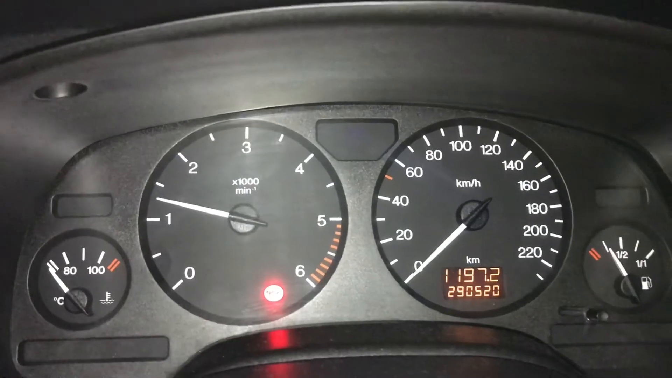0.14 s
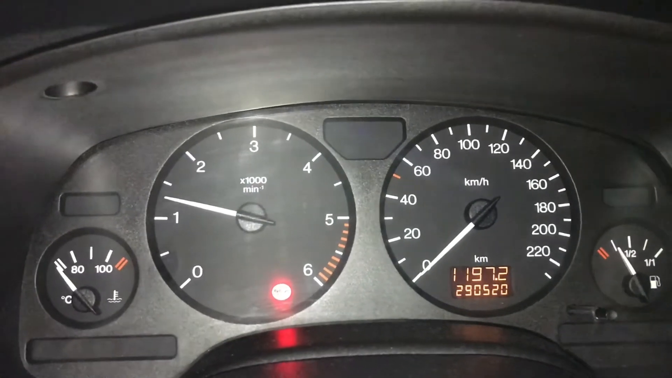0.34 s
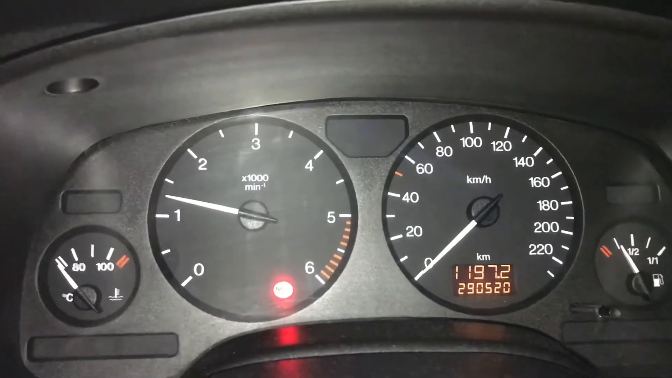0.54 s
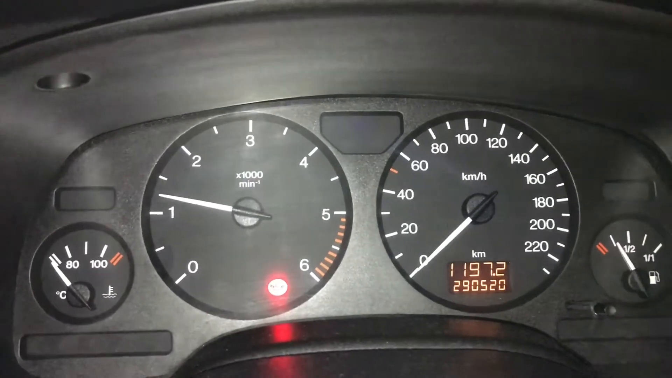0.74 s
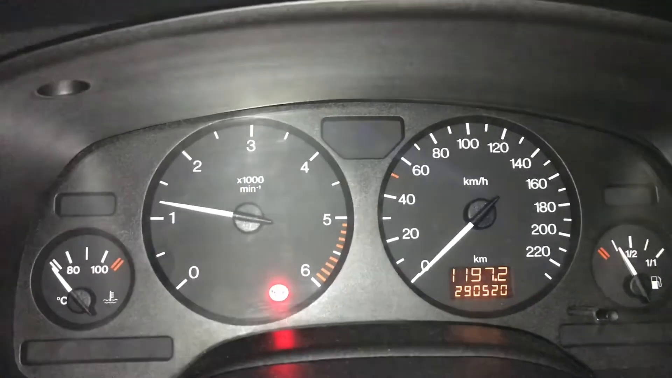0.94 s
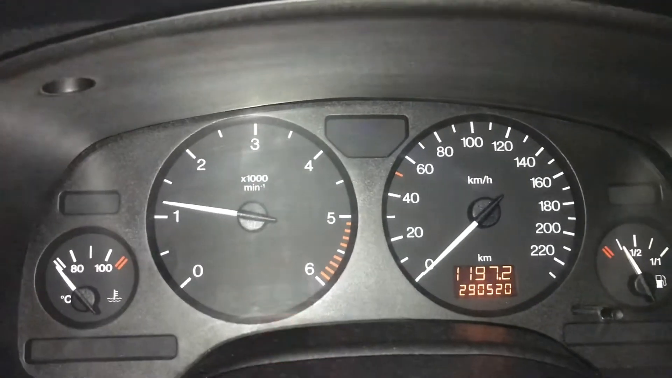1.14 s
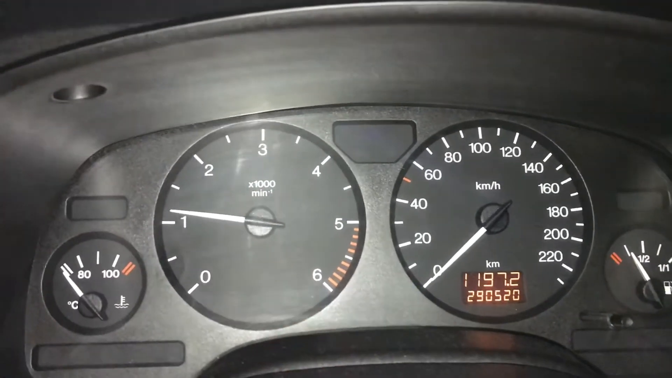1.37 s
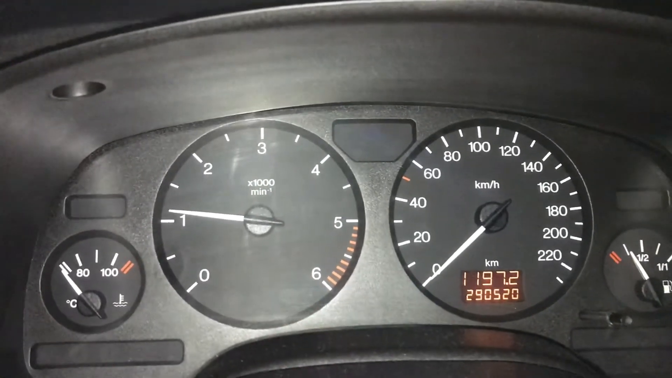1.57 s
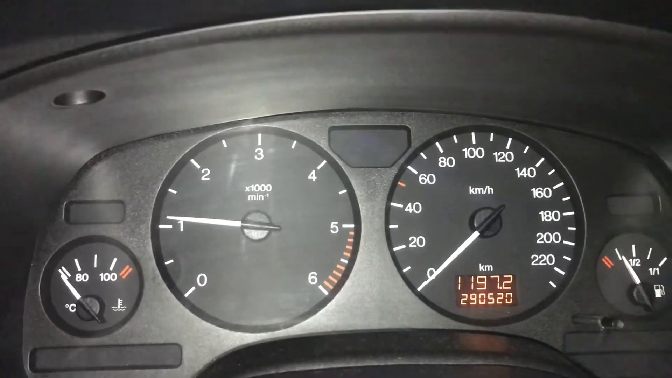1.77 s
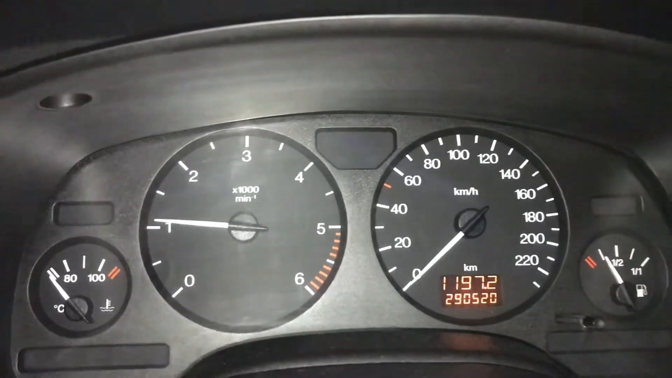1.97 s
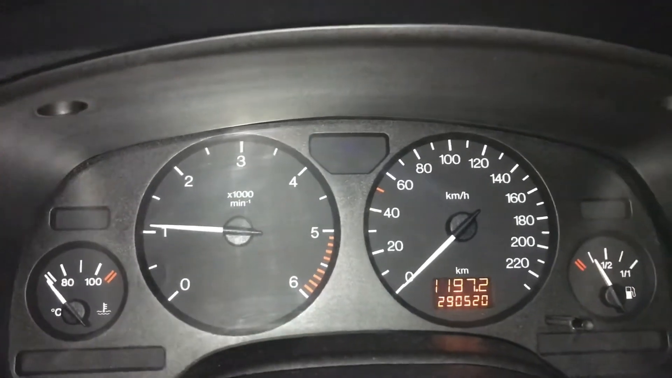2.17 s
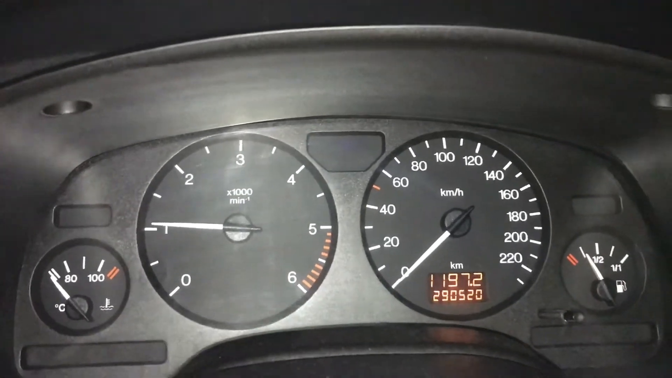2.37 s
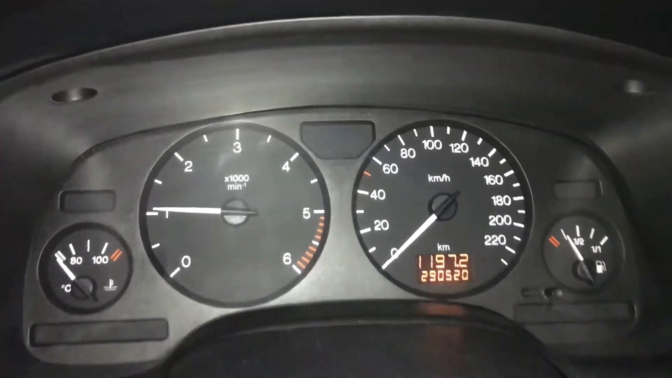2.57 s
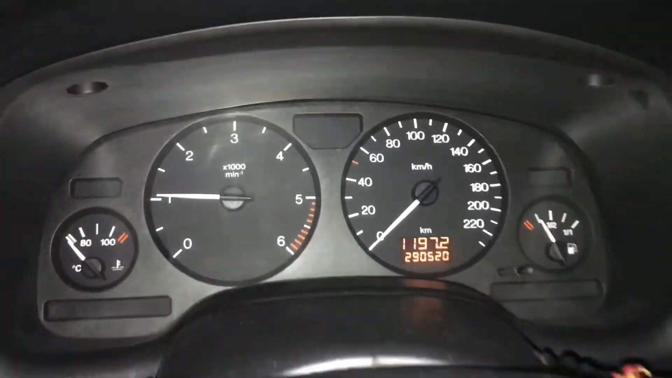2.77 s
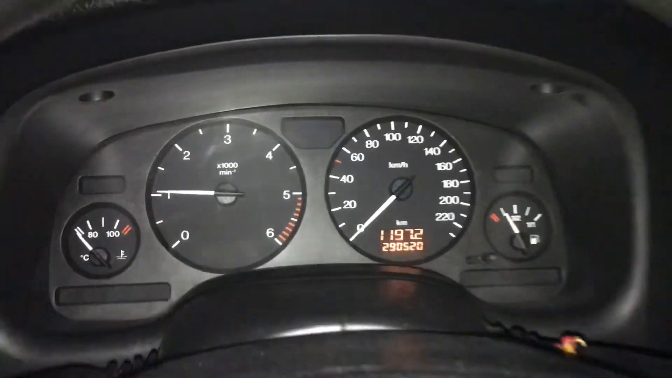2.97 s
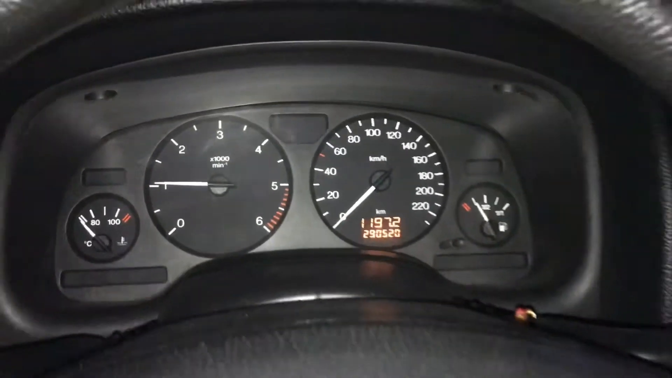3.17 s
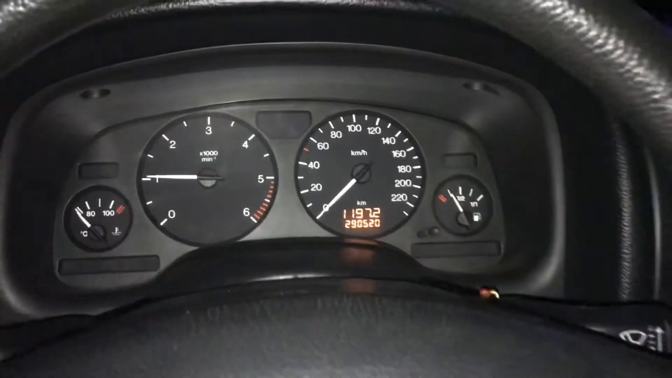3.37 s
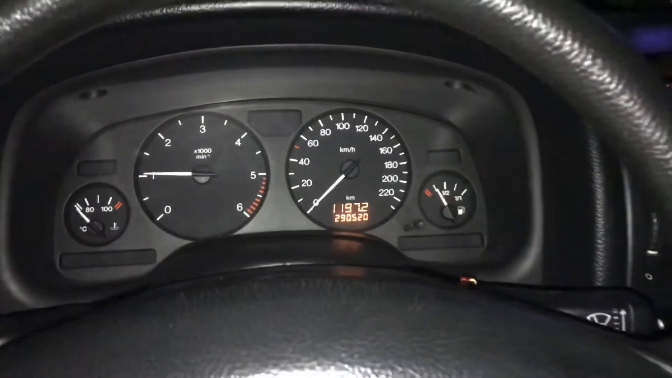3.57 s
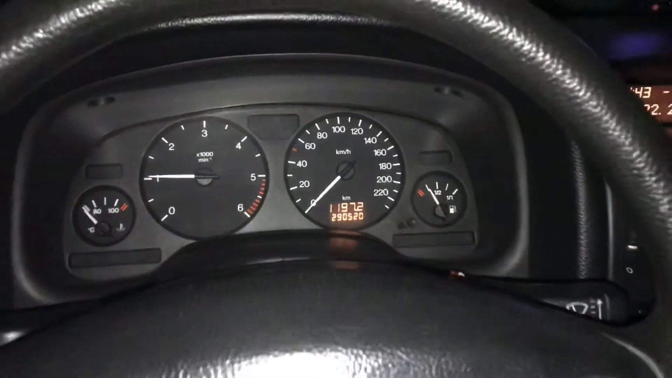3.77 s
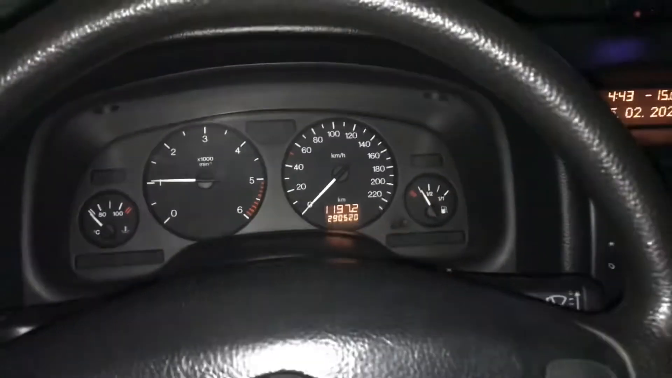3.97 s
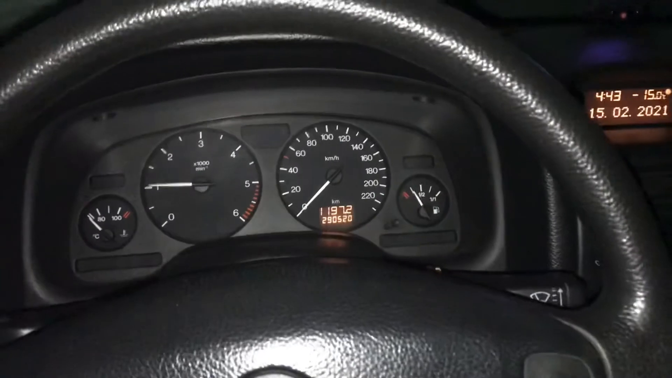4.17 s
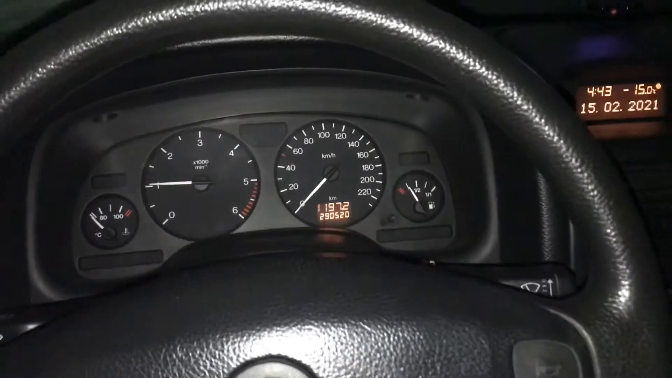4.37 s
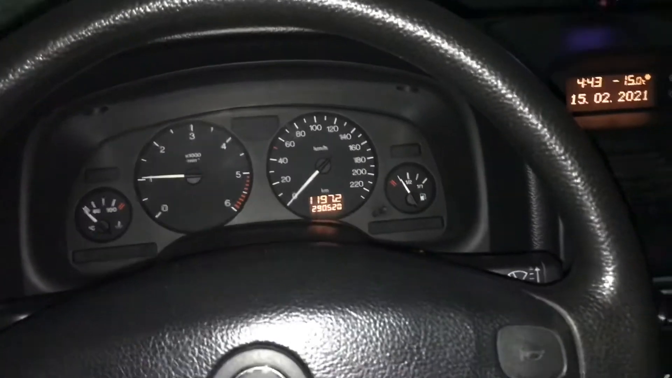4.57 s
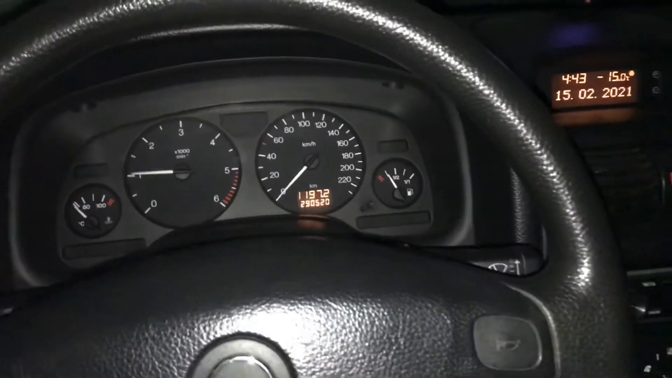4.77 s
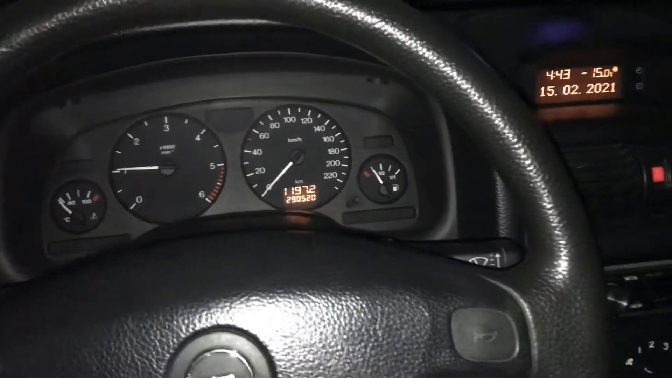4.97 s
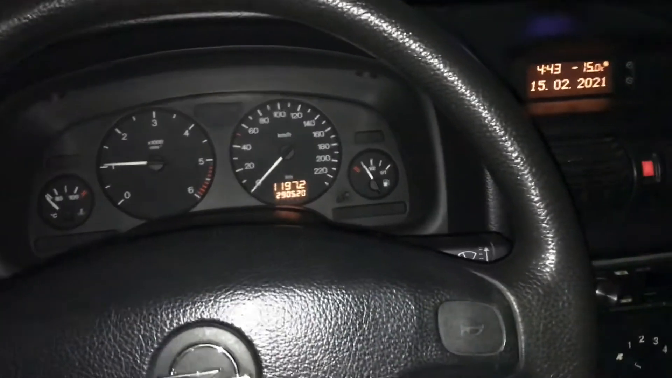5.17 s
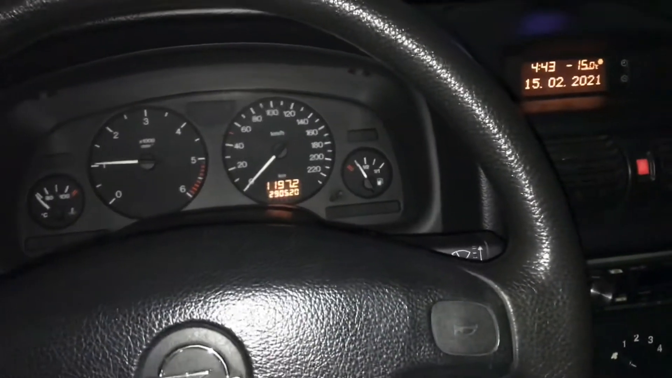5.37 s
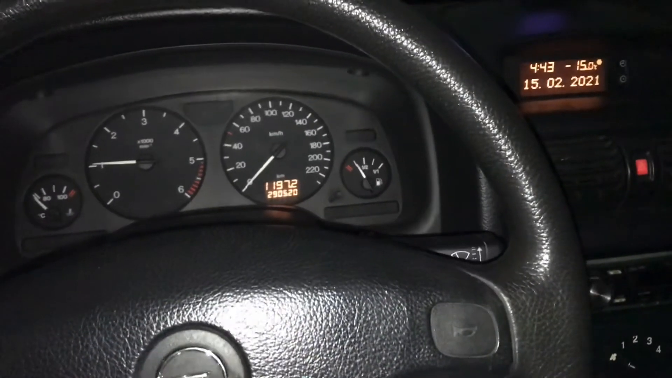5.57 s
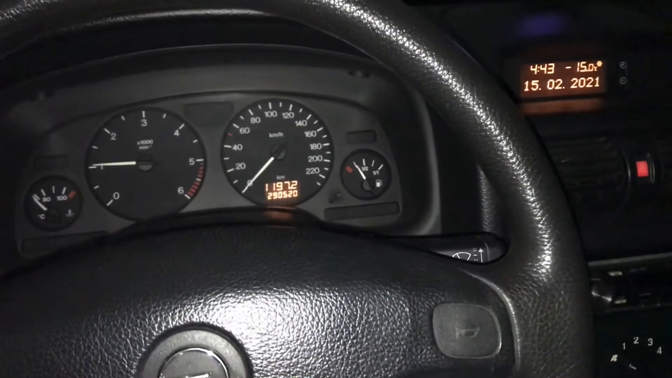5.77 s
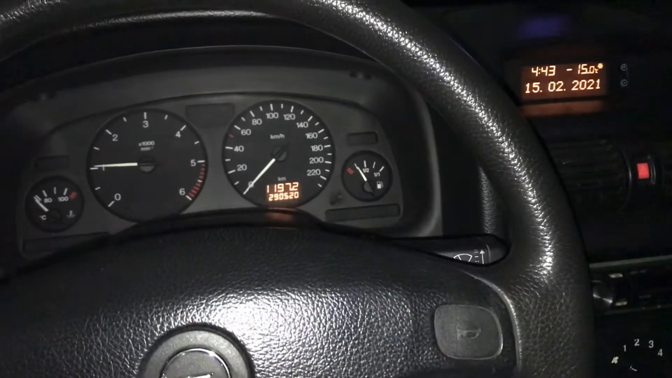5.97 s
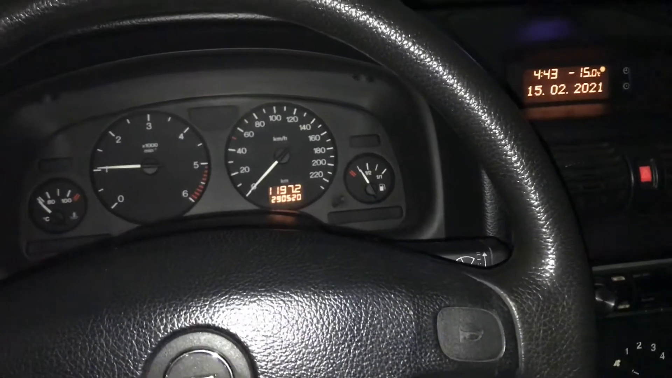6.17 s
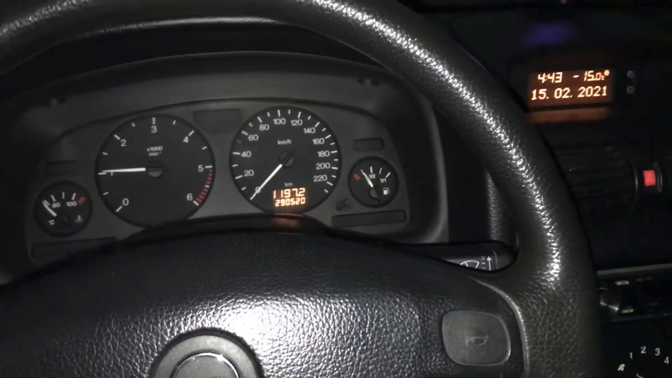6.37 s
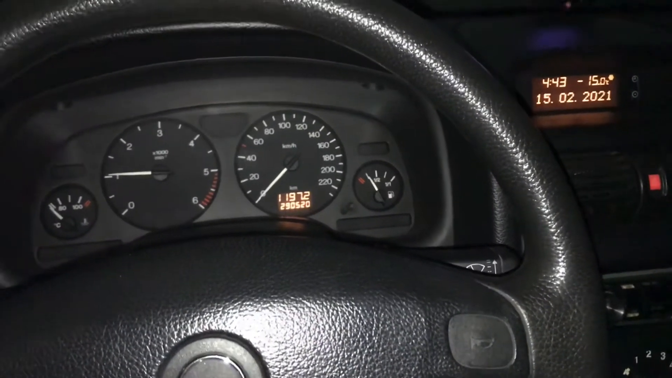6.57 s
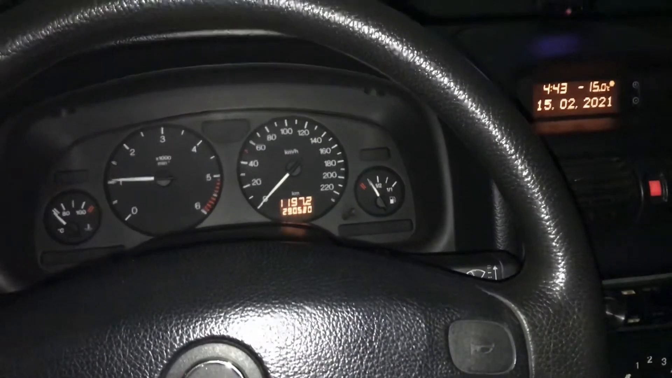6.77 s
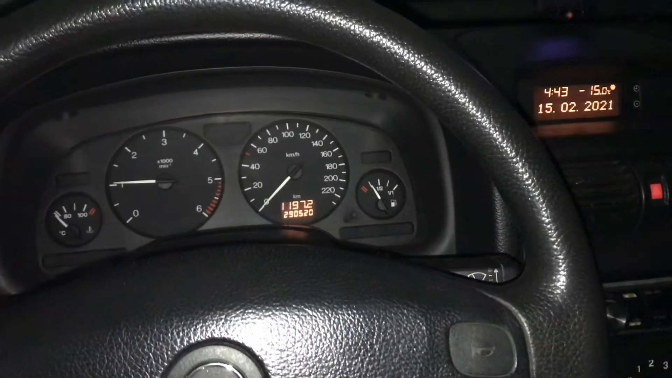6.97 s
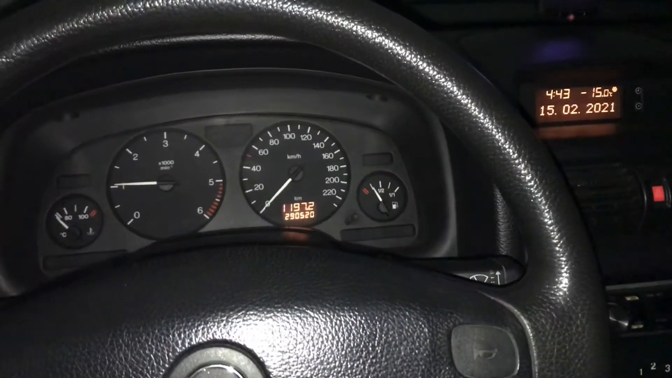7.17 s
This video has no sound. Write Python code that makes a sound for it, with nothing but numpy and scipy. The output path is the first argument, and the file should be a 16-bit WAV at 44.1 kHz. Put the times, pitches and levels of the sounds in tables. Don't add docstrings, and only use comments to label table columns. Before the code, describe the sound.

A phone close to the dashboard hears a cold four-cylinder diesel just after it catches, with no cranking. At 0 s a short, loud jolt leads into a fast idle, about 43 firings per second: a heavy low boom, rough bodywork clatter and hard knocks in a repeating four-beat pattern. Plastic trim ticks and soft low bumps from a finger come in the first half second, the deepest at 0.44. The engine slows steadily; the boom thins and stumbles at 1.2 and 1.7, with a light jolt near 1.3 and a faint high clip buzz. From 1.7 to 2 a loose panel ticks rapidly as speed dips to about 34.5. It then holds near 35 until 7.2. Between 2.7 and 4.4 the phone backs away with faint hand rustle; panel hum fades, while clacks, valve clicks and injector pings become clearer over low rumble and light hiss.

```python
import sys
import numpy as np
from scipy import signal
from scipy.fft import rfft, irfft, next_fast_len
from scipy.io import wavfile
from scipy.ndimage import uniform_filter1d

SR = 44100
rng = np.random.default_rng(int(sys.argv[2]) if len(sys.argv) > 2 else 0)


def ratio(d):
    e = np.asarray(d, float) / 20
    return 10 ** e


def to_wav(sig):
    pcm = np.clip(np.atleast_2d(sig), -1, 1) * 32767
    pcm = np.round(pcm).astype(np.int16)
    wavfile.write(sys.argv[1], SR, pcm.T)


N = 318843
COARSE = 10

CYLINDER_DB = [-1.5, .8, .3, -1.5]
# [t/s, level/dB, half length/s]
JOLTS = [
    (0.0, 12, .015),
    (1.29, 3, .015),
    (2.7, 4, .04),
    (3.85, 4, .025),
]


def curve(table, column):
    rows = np.array(table)
    return np.interp(np.arange(N) / SR, rows[:, 0], rows[:, column])


def unit(x):
    return x / np.sqrt(np.mean(x ** 2))


def colour(x, points):
    size = next_fast_len(N)
    hz = np.maximum(np.arange(size // 2 + 1) * SR / size, 1)
    f, db = np.transpose(points)
    gain = ratio(np.interp(np.log(hz), np.log(f), db, left=-90, right=-90))
    return irfft(rfft(x, size) * gain, size)[:N]


def ring(x, modes):
    return sum(ratio(db) * signal.lfilter(*signal.iirpeak(hz, hz / width, SR), x) for hz, width, db in modes)


def walk(rate_hz, hop=50):
    k = int(SR / rate_hz / hop)
    held = np.repeat(rng.standard_normal(N // hop // k + 2), k)
    slow = 1.3 * uniform_filter1d(uniform_filter1d(held, k), k)
    return np.interp(np.arange(N) / hop, np.arange(len(slow)), slow)


def swell(events):
    return sum(db * np.exp(-((np.arange(N) / SR - s) / half) ** 2) for s, db, half in events)


def span(start_s, end_s, edge_s=.02):
    t = np.arange(N) / SR
    return np.clip(np.minimum(t - start_s, end_s - t) / edge_s, 0, 1)


def heard_db(away, near_db, away_db, drift_db_per_s):
    return near_db + away * (away_db - near_db) + drift_db_per_s * np.arange(N) / SR


def cold_db():
    return 1.5 * span(-1, 2.03)


def firings(turn, at, pattern_db, scatter_db):
    count = np.floor(turn - at).astype(int)
    where = np.flatnonzero(np.diff(count) > 0) + 1
    cylinder = count[where] % 4
    scatter = scatter_db * rng.standard_normal(len(where))
    out = np.zeros((4, N))
    out[cylinder, where] = ratio(np.array(pattern_db)[cylinder] + scatter)
    return out


def burst_shape(hits, fade_s):
    return unit(signal.lfilter([1], [1, -np.exp(-1 / (fade_s * SR))], hits.sum(axis=0)))


def repeat(hits, own, rise_s, fade_s):
    age = np.arange(6000) / SR
    envelope = np.exp(-age / fade_s) * (1 - np.exp(-age / rise_s))
    spectra = rfft(envelope * rng.standard_normal((5, 6000)))
    shakes = irfft(spectra / np.abs(spectra))
    responses = shakes[0] + own * shakes[1:]
    return unit(signal.fftconvolve(hits, responses, axes=1)[:, :N].sum(axis=0))


def rumble(away):
    # [f/Hz, level/dB per Hz]
    rumble_colour = [(30, -24), (55, -1.5), (90, 2.5), (130, 4), (200, -3.5), (270, -4), (340, -7),
                     (420, -39.5)]
    level_db = -64.5 + 3.24 * (3 - away) + 0.65 * walk(9.4)
    return ratio(level_db) * unit(colour(rng.standard_normal(N), rumble_colour))


def hiss(burst, points, gate):
    noise = ratio(0.77 * walk(5.3)) * rng.standard_normal(N)
    return unit(colour((1 + gate * burst) * noise, points))


def air(burst, away):
    # [f/Hz, level/dB per Hz]
    low_colour = [(2290, -26.5), (3900, -7), (4770, -11), (5230, -9.5), (5610, -10.5), (6550, -10),
                  (7600, -17.5), (9880, -41.5), (16700, -120)]
    # [f/Hz, level/dB per Hz]
    high_colour = [(4470, -27), (7600, -2.5), (9340, 1), (10400, -4.5), (11700, -0.5), (13900, -3),
                   (14600, -1.5), (15500, -20)]
    # [from/s, to/s, level/dB]
    rustles = [
        (0.725, 1.373, 4),
        (2.15, 4.148, 3),
    ]
    rustle_db = sum(db * span(start, end) for start, end, db in rustles)
    low_db = heard_db(away, near_db=-81.5, away_db=-83, drift_db_per_s=-0.44) + 0.57 * rustle_db - 2.0
    high_db = heard_db(away, near_db=-87, away_db=-88, drift_db_per_s=-0.37) + rustle_db
    burst = burst * (0.19 + away)
    return ratio(low_db) * hiss(burst, low_colour, 0.07) + ratio(high_db) * hiss(burst, high_colour, 0.23)


def bump():
    # [peak/dB, f/Hz, width/Hz]
    bumps = [
        (-25, 115, 60),
        (-46, 270, 12),
        (-47, 270, 12),
        (-50, 168, 7),
        (-49, 285, 14),
        (-51, 265, 12),
        (-52, 176, 5),
    ]
    bump_s = [.4422, .13, .23, .17, .44, 1.06, 2.06]
    age = np.arange(0, N, COARSE) / SR - np.array(bump_s)[:, None]
    db, hz, width = np.transpose(bumps)[:, :, None]
    fade = np.exp(-(3.0 * width * age) ** 2)
    swing = -(ratio(db) * np.cos(2 * np.pi * hz * age) * fade).sum(axis=0)
    return signal.resample_poly(swing, COARSE, 1)[:N]


def rattle():
    rows = []
    for k in range(10):
        weak = k % 4 == 3 or k == 0
        for hz in (3900, 2400):
            rows.append((1.691 + k * .0283, -54 - 4 * weak, hz, -24, 0.069))
    return rows


def trim():
    # [t/s, peak/dB, f/Hz, bright share/dB, t60/s]
    ticks = [(0.0054, -59, 3570, -4, 0.047), (0.121, -59, 2560, -8, 0.065), (0.133, -49.5, 4200, -9, 0.052),
             (0.1554, -70, 2680, -10, 0.071), (0.4247, -52, 3050, -17.5, 0.098),
             (0.453, -66, 2670, -5, 0.064), (0.479, -60, 2560, -17, 0.15), (1.0464, -54, 2700, -30, 0.12),
             (1.2765, -56.5, 2780, -10, 0.077), (2.5545, -69, 3310, -4.5, 0.07),
             (2.6553, -65, 3290, -18, 0.07), (4.6542, -71, 3060, -10, 0.07),
             (4.9694, -68, 3010, -13, 0.084)]
    # [f/Hz, level/dB per Hz]
    tick_colour = [(2000, -20), (3000, 0), (6000, -2), (9500, -5), (10700, -12), (12000, -4), (15500, -8)]
    out, age = np.zeros(N), np.arange(5000) / SR
    white = rng.standard_normal(N)
    bright = unit(colour(white, tick_colour))
    for s, db, hz, bright_db, t60 in ticks + rattle():
        i = int(s * SR)
        fade = np.exp(-np.log(1000) * age / t60) * np.minimum(age / 0.00097, 1)
        panel = ring(ring(white[i:i + 5000], [(hz, 2600, 0)]), [(hz, 1200, 10)])
        edge = ratio(bright_db + 13.5) * fade ** 1.06 * bright[i:i + 5000]
        out[i:i + 5000] += ratio(db - 12) * (fade * panel + edge)
    return out


def buzz(turn):
    hits = firings(turn, 0.66, CYLINDER_DB, scatter_db=3.0)
    tick = repeat(hits, own=0.59, rise_s=0.00038, fade_s=0.0032)
    clip = [(8900, 1500, 0)]
    return ratio(-92) * span(.73, 2.1) * unit(ring(ring(tick, clip), clip))


def strike(turn, pattern_db, modes):
    hits = firings(turn, .88, pattern_db, scatter_db=2.5)
    return unit(ring(hits.sum(axis=0), modes))


def ping(turn, away):
    # [f/Hz, width/Hz, level/dB]
    pipes = [(5290, 280, 2), (9300, 600, -5), (11600, 480, -7), (4560, 170, 0), (6570, 200, -2)]
    pattern_db = [-1, 1, 1, -1]
    level_db = heard_db(away, near_db=-101, away_db=-92.5, drift_db_per_s=0)
    return ratio(level_db) * ring(strike(turn, pattern_db, pipes), pipes)


def clack(turn, away):
    # [f/Hz, width/Hz, level/dB]
    cover = [(1989, 76, -2), (1385, 81, -3.5)]
    pattern_db = [2.5, 4, -5, -3.5]
    level_db = heard_db(away, near_db=-85, away_db=-77, drift_db_per_s=0)
    return ratio(level_db) * ring(strike(turn, pattern_db, cover), [(1900, 500, 0)])


def panel_hum(turn, away):
    # [f/Hz, width/Hz, level/dB]
    panel = [(738, 24, 0)]
    pattern_db = [-5, 0, 2, -3]
    level_db = heard_db(away, near_db=-59.5, away_db=-100, drift_db_per_s=.3)
    return ratio(level_db) * ring(strike(turn, pattern_db, panel), [(739, 80, 0)])


def clatter(turn, away):
    # [f/Hz, level/dB per Hz]
    near_colour = [(200, -37), (340, 2), (398, -3.5), (430, -4), (570, -7.5), (741, -4.5), (808, -7.5),
                   (892, -9.5), (1110, -13), (1250, -20), (1620, -41.5), (2750, -120)]
    # [f/Hz, level/dB per Hz]
    away_colour = [(200, -24.5), (340, -22), (361, -2.5), (387, 2), (531, -6), (583, -2.5), (729, -7),
                   (791, -7.5), (873, -6.5), (1250, -27), (1620, -47), (2750, -120)]
    # [f/Hz, width/Hz, level/dB]
    near_modes = [(724, 60, -6), (914, 96, 1), (432.6, 17, 2.5)]
    # [f/Hz, width/Hz, level/dB]
    away_modes = [(608, 43, 2), (766, 27, 7), (1069, 23, 10.5)]
    hits = firings(turn, .7, np.zeros(4), scatter_db=.5)
    shake = repeat(hits, own=.55, rise_s=.015, fade_s=.09)
    shake = shake + .4 * rng.standard_normal(N) * ratio(2.7 * walk(17))
    shake = signal.sosfilt(signal.butter(6, 330, "high", fs=SR, output="sos"), shake)
    near = unit(colour(shake + ring(shake, near_modes), near_colour))
    far = unit(colour(shake + ring(shake, away_modes), away_colour))
    level_db = heard_db(away ** 0.22, near_db=-55, away_db=-58, drift_db_per_s=0.15)
    level_db = level_db + 0.86 * swell(JOLTS) + cold_db() - 2.04
    return ratio(level_db) * (np.sqrt(1 - away) * near + np.sqrt(away) * far)


def rap(turn, away):
    # [f/Hz, width/Hz, level/dB]
    bulkhead = [(1317, 150, 4), (1418, 57, 3), (1635, 620, 0.5), (1918, 140, -13.5), (2610, 250, -19)]
    valve_db = [-14, -18, 0, -25]
    hits = firings(turn, .85, CYLINDER_DB, scatter_db=1.2)
    burst = burst_shape(hits, fade_s=.012)
    clicks = firings(turn, .17, valve_db, scatter_db=1.2)
    valve = away * repeat(clicks, own=1, rise_s=.0003, fade_s=.002)
    shake = repeat(hits, own=1, rise_s=.004, fade_s=.025) + .35 * valve
    shake = shake + (0.62 * burst + 0.59 + .25 * (1 - away)) * rng.standard_normal(N)
    level_db = heard_db(away, near_db=-68, away_db=-69.5, drift_db_per_s=0.18) + swell(JOLTS)
    return ratio(level_db) * unit(ring(ring(shake, bulkhead), [(1560, 1500, 0)]))


def knock(turn, away):
    # [f/Hz, width/Hz, level/dB]
    block = [(3218, 285, 21.5), (3450, 400, 4.5), (3640, 49, -22), (4200, 150, -6.5), (5140, 170, -2.5)]
    injector_db = [-3, -1.5, 4, -1.5]
    ticks = firings(turn, .76, injector_db, scatter_db=1.2)
    hits = ticks + ratio(-2.5) * firings(turn, .94, CYLINDER_DB, scatter_db=1.5)
    burst = burst_shape(hits, fade_s=.005)
    shake = repeat(hits, own=.9, rise_s=.0015, fade_s=.007)
    shake = shake + (0.63 * burst + 0.5 + .5 * (1 - away)) * rng.standard_normal(N)
    level_db = heard_db(away, near_db=-78.5, away_db=-75, drift_db_per_s=-0.38) + 1.54 * cold_db()
    return ratio(level_db) * unit(ring(ring(shake, block), [(3420, 2200, 0)])), burst


def boom_db(rate, away):
    # [firing rate/Hz, first order/dB, second/dB, third/dB]
    boom = [(34.3, -41.5, -50.5, -47.5), (36.51, -42.5, -49, -46), (35.26, -40.5, -46.5, -52),
            (36.6, -34.5, -41.5, -51.5), (38.16, -30.5, -49, -52.5), (38.1, -32, -44, -67),
            (39.6, -29.5, -45.5, -59.5), (42.7, -28.5, -43.5, -44.5), (42.35, -29.5, -45.5, -58)]
    boom_away_db = [0.6, 0.2, 0.23]
    boom_drift_db_per_s = [-0.53, 0.31, -0.1]
    # [t/s, level/dB, half length/s]
    stumbles = [
        (.82, -1.5, 0.044),
        (1.18, -10, 0.035),
        (1.7, -5, 0.045),
        (1.98, -2, 0.07),
    ]
    rows = np.array(boom)
    db = []
    for k in range(3):
        response = np.interp(rate, rows[:, 0], rows[:, k + 1])
        db.append(response + heard_db(away, 0, boom_away_db[k], boom_drift_db_per_s[k]))
    db[0] = db[0] + swell(stumbles)
    return db


def order_tone(turn, k, slip):
    group = round(k)
    lead = .1 * (group - 1) ** 2
    beat = (.8 + 4 / 7 * (group - 1)) * (k - group)
    return np.sqrt(2) * np.cos(2 * np.pi * (k * turn + lead + beat + slip))


def orders(turn, rate, rush, away):
    # [multiple of firing rate, near/dB, away/dB]
    weak_orders = [(1.25, -59, -55.5), (1.5, -62, -75.5), (1.75, -71, -94), (2.25, -70, -70.5),
                   (2.5, -61.5, -62.5), (2.75, -70.5, -74.5), (3.25, -75, -78.5), (3.5, -66.5, -75.5),
                   (3.75, -68, -60.5), (4.0, -58.5, -56), (4.25, -79, -90.5), (4.5, -79.5, -68),
                   (4.75, -73, -77.5), (5.0, -58.5, -64.5), (5.5, -73.5, -71), (6.0, -63.5, -68.5),
                   (7.0, -82, -71.5), (7.25, -92, -73), (7.75, -63.5, -66.5), (8.0, -56, -58.5),
                   (8.25, -65, -69), (8.5, -73, -69), (8.75, -64, -72.5), (9.0, -70, -68.5),
                   (9.5, -68, -66.5),
                   (6.25, -80.5, -85.5), (6.5, -90, -72), (6.75, -75.5, -73), (10.5, -84, -71),
                    (14.5, -77.5, -79.5)]
    boom_turns = [(0, 0), (.12, -.09), (.12, -.1)]
    strong_db = np.array(boom_db(rate, away))[:, ::COARSE]
    turn, rush, away = turn[::COARSE], rush[::COARSE], away[::COARSE]
    out = np.zeros(len(turn))
    for k, (near, far) in enumerate(boom_turns):
        out += ratio(strong_db[k]) * order_tone(turn, k + 1, near + away * (far - near))
    for k, near_db, away_db in weak_orders:
        db = near_db + away * (away_db - near_db) + 0.94 * walk(2.83)[::COARSE]
        db = db - 4.5 * min(k, 9) * rush
        if k == 5:
            db = db + 5 * 4 * away * (1 - away)
        out += ratio(db) * order_tone(turn, k, .003 * k * walk(2)[::COARSE])
    return signal.resample_poly(out, COARSE, 1, padtype="smooth")[:N]


def scene():
    # [t/s, firing rate/Hz]
    speed = [(0.0, 42.869), (0.25, 41.814), (0.5, 40.204), (0.75, 38.922), (1.0, 37.642), (1.3, 36.664),
             (1.6, 35.743), (1.9, 34.546), (2.3, 35.313), (2.8, 34.815), (3.4, 35.089), (4.0, 35.36),
             (4.6, 35.528), (5.2, 35.447), (5.8, 35.29), (6.5, 35.374), (7.23, 35.325)]
    # [t/s, backed away 0-1]
    backing = [
        (0, 0),
        (2.7, .03),
        (3.1, .55),
        (4.4, 1),
        (7.23, 1),
    ]
    rate = curve(speed, column=1)
    rush = np.maximum(rate / rate[-1] - 1, 0)
    turn = .02 + np.cumsum(rate) / SR
    crank = turn + 1.2 * np.minimum(rush, .14)
    away = np.clip(curve(backing, column=1), 0, 1)
    knocks, burst = knock(crank, away)
    background = rumble(away) + air(burst, away) + bump() + trim() + buzz(turn)
    rings = ping(crank, away) + clack(crank, away) + panel_hum(crank, away)
    engine = clatter(crank, away) + rap(crank, away) + knocks + orders(turn, rate, rush, away)
    return (background + rings + engine)[None]


def band_limit(x):
    return signal.sosfilt(signal.butter(12, 15650, fs=SR, output="sos"), x)


def record(dry):
    return band_limit(dry)


dry = scene()
out = record(dry)
to_wav(out)
```